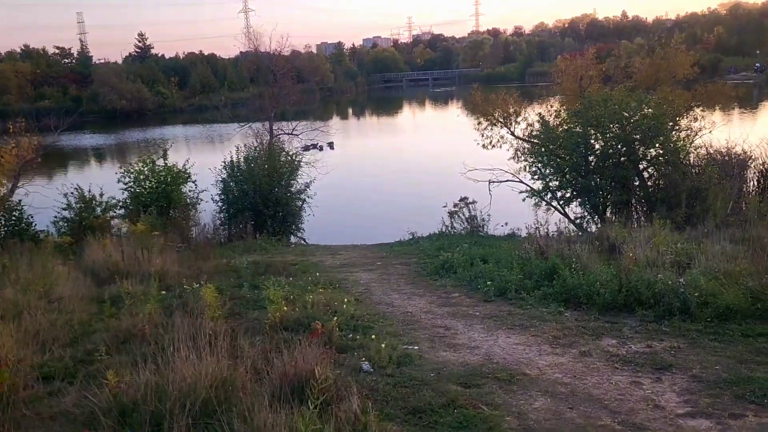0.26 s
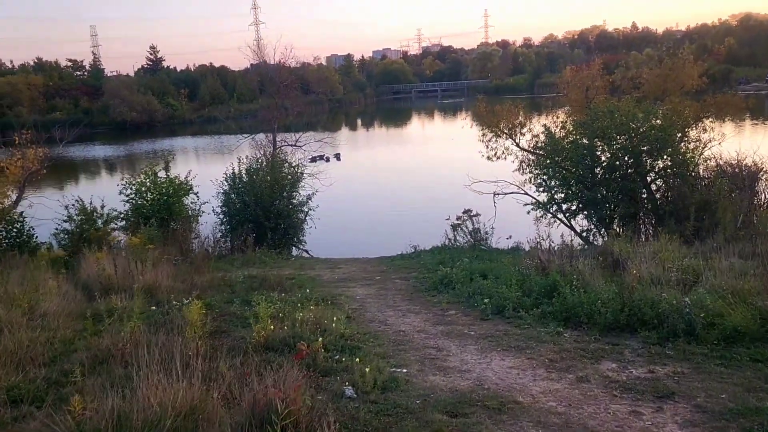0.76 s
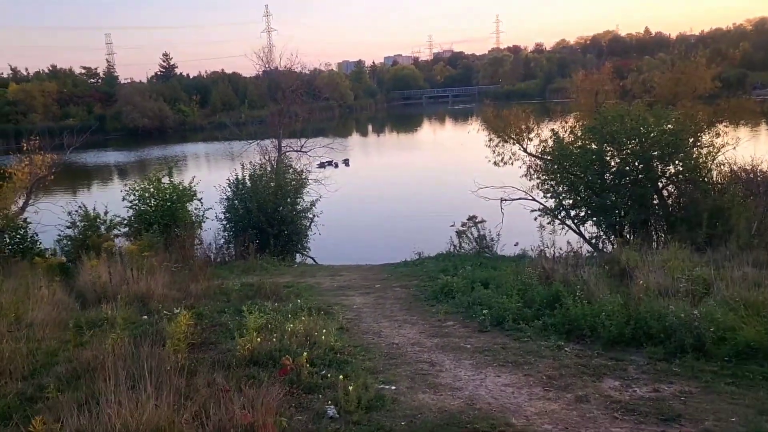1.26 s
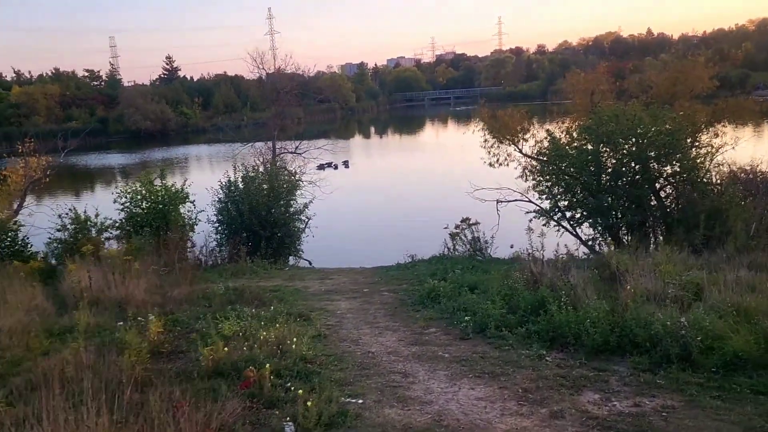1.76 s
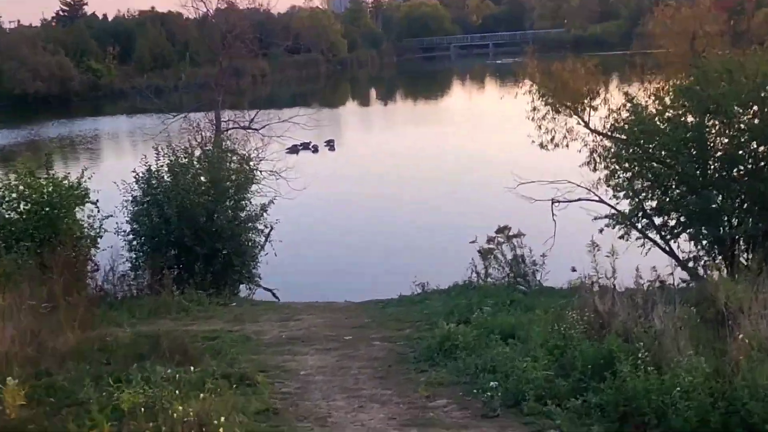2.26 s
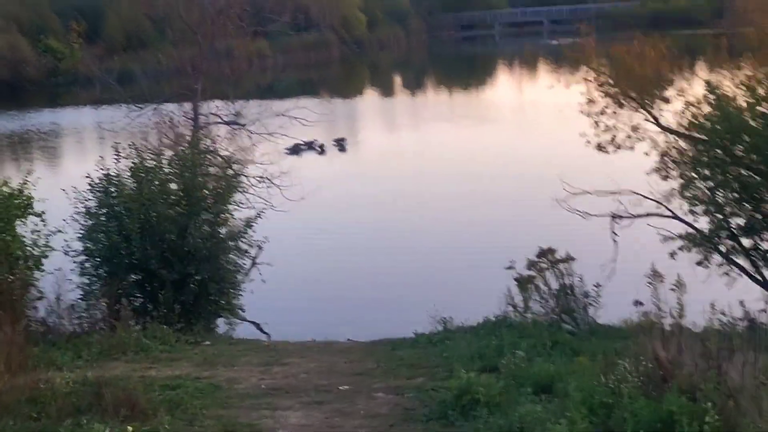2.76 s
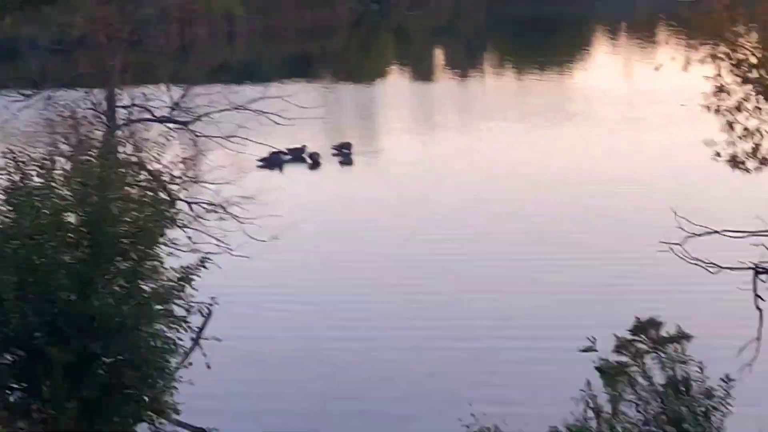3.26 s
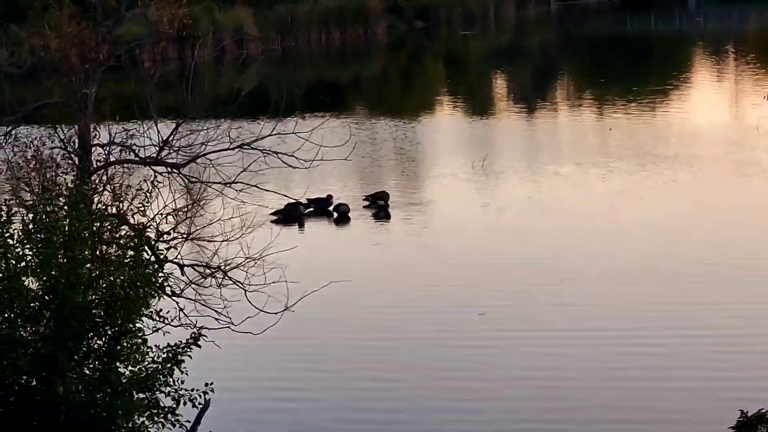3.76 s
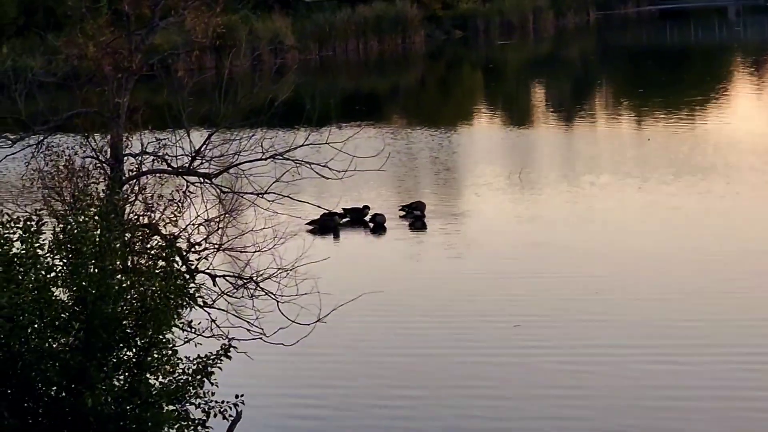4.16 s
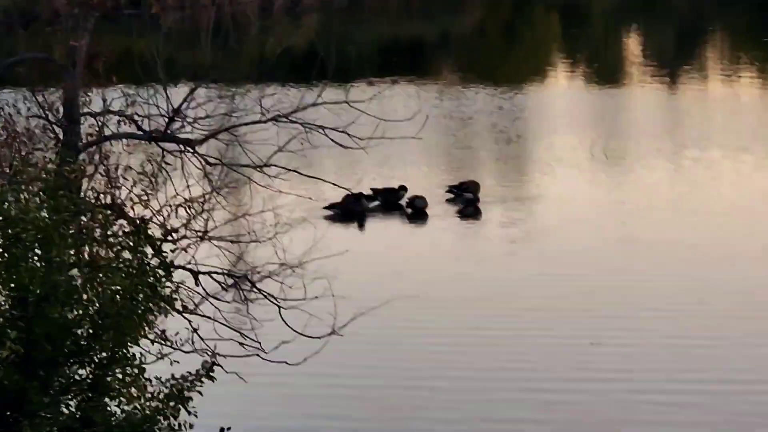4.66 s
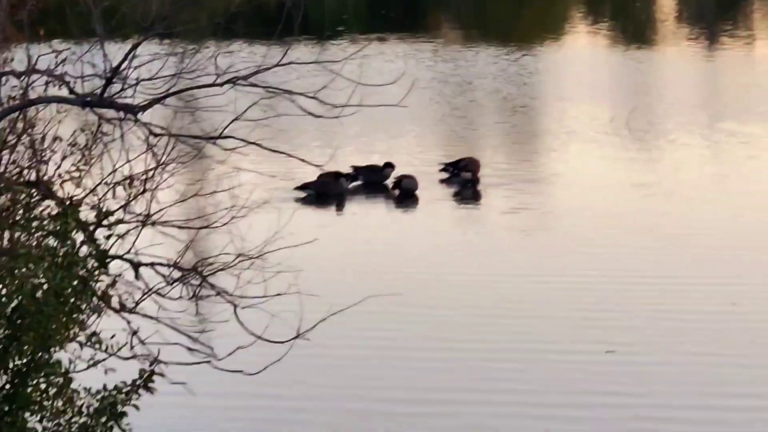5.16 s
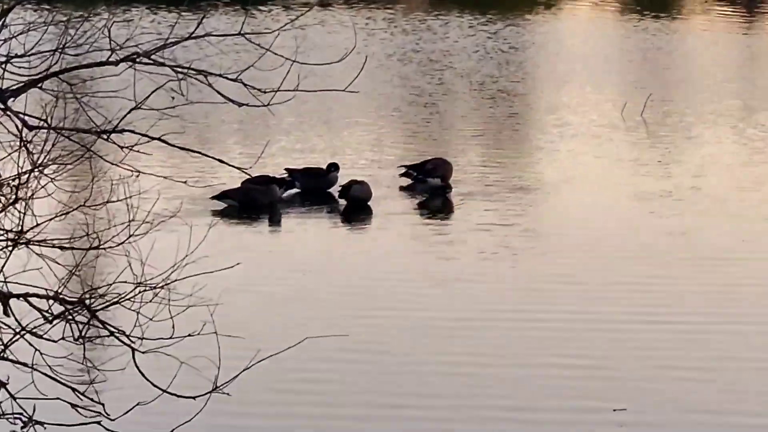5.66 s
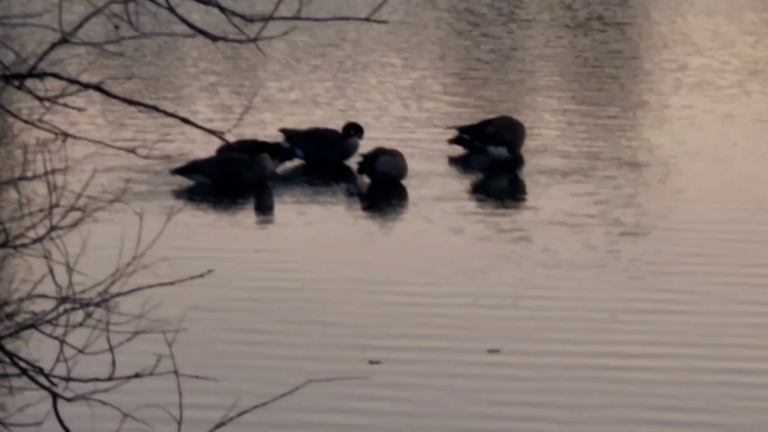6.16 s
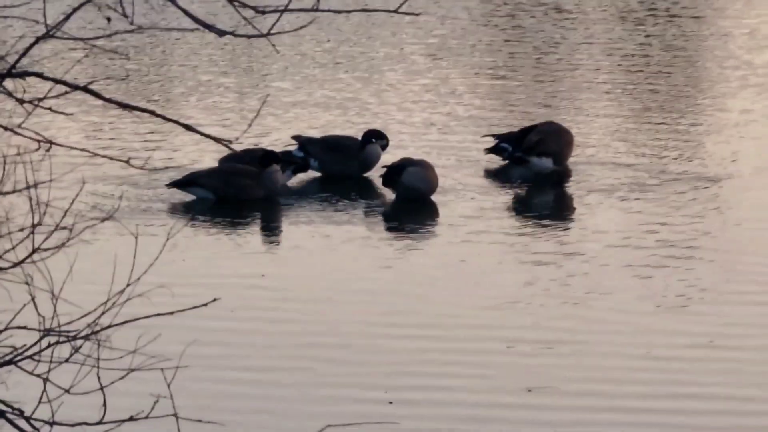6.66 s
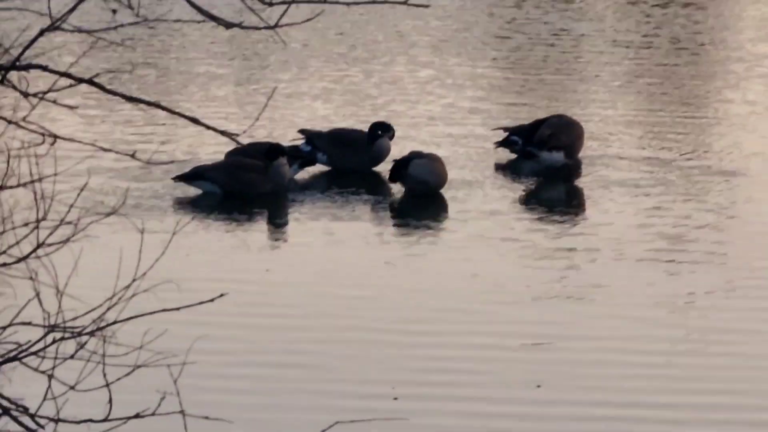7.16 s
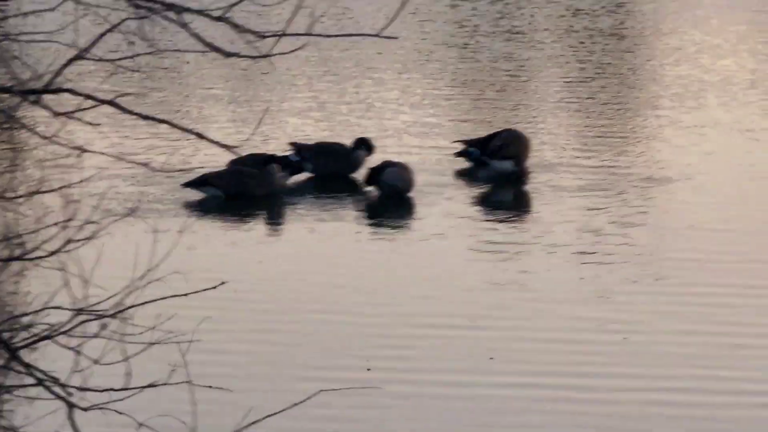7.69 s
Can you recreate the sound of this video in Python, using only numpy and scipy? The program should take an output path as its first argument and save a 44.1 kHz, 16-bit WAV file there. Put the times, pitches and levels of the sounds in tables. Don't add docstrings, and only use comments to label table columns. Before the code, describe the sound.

A still pond outdoors at dusk, captured nearly in mono by a phone with a thinned, noise-reduced background and cut treble. Very soft distant traffic, faint insect hiss and quick bush-cricket rasps run throughout, about thirteen strokes a second, with tiny far peeps and slight low wind puffs. At 0.35 seconds a goose honks loudly: a brief low hoarse note snaps at 0.4 into a higher, brassy one, sags and ends by 0.5, leaving a faint bank echo. At about 1.5 a sharp hollow knock clacks, with a quick rattle. A small peep comes near 2.1. The second honk, at 2.85 to 3.0, is similar and bright, after a faint tree-cricket trill rises. From 3 seconds a lower cricket pulses evenly. The last honk comes at 5.55 to 5.7. Afterwards only quiet murmurs, weak peeps and crickets remain until about 7.9.

```python
import sys
import numpy as np
from scipy import signal
from scipy.io import wavfile
from scipy.ndimage import uniform_filter1d

SR = 44100
rng = np.random.default_rng(int(sys.argv[2]) if len(sys.argv) > 2 else 0)


def ratio_of_db(decibels):
    return 10 ** (np.asarray(decibels, float) / 20)


def store_pcm(level_fs):
    pcm = np.round(np.clip(level_fs, -1, 1) * 32767).astype(np.int16)
    wavfile.write(sys.argv[1], SR, np.atleast_2d(pcm).T)


N = 349713

# f/Hz, level per Hz/dB
TRAFFIC_COLOUR = [(71, -44), (120, -19.5), (178, -14.5), (243, -13), (433, -2), (509, 0.5), (558, -1.5),
                  (605, -2), (1130, -1.5), (1360, -7.5), (1600, -28), (1750, -31.5), (1900, -35),
                  (2470, -47.5), (4180, -120)]
SWELL_DB = [10, 4.5, 6.5]
BREAKS = [
    0.4,
    2.896,
    5.59,
]
# t/s, peak level/dB, half length/s
GUSTS = [(.01, -65.5, 0.18), (0.412, -69, .14), (1.369, -81, .08), (1.501, -81.5, .08), (5.151, -87, .12),
         (2.315, -75, .12), (2.869, -71, .11), (3.183, -70.5, 0.1), (3.491, -71, 0.062), (4.57, -73, 0.15),
         (4.959, -74, .12), (5.582, -79.5, .1), (6.688, -73.5, 0.11), (7.002, -83.5, .3),
         (7.739, -75, 0.13)]
# f/Hz, level per Hz/dB
GUST_COLOUR = [(15, -29.5), (40, -16.5), (62, 6), (100, 0), (160, -11), (300, -32)]
# t/s, level/dB
CHORUS = [(0.0, -65.5), (1.37, -86), (5.79, -65.5), (6.43, -73.5), (7.93, -67)]
# f/Hz, level per Hz/dB
CHORUS_COLOUR = [(3800, -22.5), (4600, -17), (5100, -13.5), (6000, -1), (7000, 12), (7900, -2), (8300, -34)]
# f/Hz, level per Hz/dB
HISS_COLOUR = [(900, -18.5), (1600, -3), (2200, 0.5), (3300, 0), (4000, -1.5), (4600, 5.5), (5200, 10.5),
               (8000, 6.5)]
# t/s, level/dB
TRILL = [(0.0, -82), (1.15, -87), (1.66, -78.5), (2.92, -73), (3.4, -89), (4.1, -91.5), (4.7, -99),
         (5.26, -98), (5.61, -82), (6.4, -83.5), (7.33, -80.5), (7.57, -87.5), (7.93, -110.5)]

# f/Hz, width/Hz, level/dB
HIGH_WING = [(6610, 380, -6), (7030, 330, 0), (7544, 330, -7)]
# first stroke t/s, last stroke t/s, level/dB
PHRASES = [(.019, 2.428, 0), (2.994, 5.519, 0), (5.596, 7.852, 0), (4.772, 5.543, -1), (7.425, 7.505, -3),
           (3.745, 3.98, -3), (6.03, 6.26, -5), (6.955, 7.035, -4)]
STROKE_COUNTS = [32, 33, 30, 11, 2, 4, 4, 2]
# t/s, peak level/dB
HIGH_EFFORT = [(0, -66.5), (.42, -48.5), (.65, -79), (.95, -72.5), (1.05, -57.5), (1.2, -73.5), (1.5, -59),
               (1.7, -72.5), (2.29, -79), (2.335, -53.5), (2.5, -70.5), (3.4, -58.5), (3.6, -66),
               (3.8, -53.5), (4.7, -57.5), (5.1, -55), (5.9, -52.5), (7.9, -55.5)]
# f/Hz, width/Hz, level/dB
LOW_WING = [(5933, 190, 6), (5550, 120, -9.5), (6450, 170, -4.5)]
# t/s, peak level/dB
LOW_EFFORT = [(3, -62.5), (3.5, -60), (4.3, -60.5), (4.9, -57.5), (6.2, -59), (7, -57.5), (7.9, -59.5)]

# middle t/s, spread/s, f/Hz, level/dB
CHIPS = [(.09, 0.029, 158, -61.5), (.106, .0094, 3900, -69), (.115, 0.013, 2564, -58.5),
         (.31, .014, 1002, -43), (.891, 0.052, 1564, -70), (1.049, 0.015, 3825, -59.5),
         (1.466, 0.006, 1310, -62), (1.6, .018, 5120, -75), (1.515, 0.014, 5200, -61.5),
         (2.161, 0.02, 1440, -59), (2.309, 0.015, 5120, -74.5), (2.367, .0098, 5170, -61),
         (2.374, .01, 3840, -64), (2.76, 0.035, 520, -55), (2.833, .009, 995, -42.5),
         (3.974, 0.0087, 2870, -67), (5.554, 0.0049, 638, -37), (6.34, 0.018, 4730, -82),
         (5.09, .004, 900, -64.5), (7.892, 0.036, 680, -59.5), (2.362, 0.011, 7090, -70),
         (2.37, 0.012, 3200, -64)]
# middle t/s, spread/s, f/Hz, level/dB
TWEETS = [(.125, .015, 1620, -68.5), (7.9, 0.015, 1366, -60), (.15, .013, 2480, -61.5),
          (.99, .017, 4930, -69), (1.069, 0.012, 2510, -60.5), (1.126, 0.016, 2470, -78),
          (2.125, 0.013, 1562, -52), (2.119, .003, 1594, -48), (2.663, 0.019, 4060, -76),
          (4.411, .015, 5140, -69), (4.91, .021, 2070, -70), (4.915, .016, 1790, -68),
          (5.446, .027, 4020, -77.5), (6.731, 0.011, 5000, -67), (1.799, 0.01, 2600, -73),
          (4.386, .012, 2105, -76), (4.475, 0.013, 5000, -74), (6.972, .0086, 3700, -74)]
# middle t/s, spread/s, f/Hz, level/dB
WHISTLES = [(.295, 0.018, 499, -49.5), (.507, .012, 4190, -63), (2.987, .009, 1379, -37.5),
            (3.045, .016, 1365, -49), (.5, 0.01, 2115, -50.5), (5.705, .016, 2070, -56),
            (2.99, .012, 2110, -55.5), (.49, 0.0042, 1304, -52), (.732, 0.0055, 6010, -70),
            (1.07, 0.054, 5050, -75.5), (1.723, 0.012, 4980, -74), (2.442, 0.016, 4300, -74),
            (2.607, 0.013, 4210, -71), (3.092, 0.015, 1374, -43.5), (3.112, 0.017, 1940, -65),
            (3.796, 0.0064, 4280, -72), (6.053, 0.021, 1950, -74.5)]
# middle t/s, spread/s, f/Hz, level/dB, bend/share of pitch per spread
BENDS = [(.322, .012, 4960, -65, .009), (.298, .015, 960, -46, .012), (2.8, .014, 940, -53, .02),
         (2.83, .008, 985, -46, .02), (5.525, .012, 4000, -70, .01), (6.16, .03, 1915, -63, -.009),
         (7.238, .026, 1870, -69, -.006), (6.638, .018, 3630, -61, .008), (6.672, .008, 4000, -66, .004),
         (6.645, .011, 2520, -69, .025), (6.845, .018, 4850, -71, -.003), (6.84, .018, 5200, -75, -.012),
         (6.885, .014, 2260, -75, -.02), (6.93, .016, 2130, -71, .015), (6.85, .014, 3560, -68, -.012),
         (6.29, .01, 4330, -76, -.01), (5.05, .012, 4780, -72, .01), (5.085, .009, 5150, -75, .012),
         (.865, .022, 2100, -73, -.004)]

# t/s, f/Hz, membrane level/dB, windpipe ring level/dB, brightness/dB
LOW_1 = [(.34, 492, -72, -47.5, -85), (.356, 489, -49.5, -33, -66.5), (0.365, 479, -42, -19.5, -52.5),
         (0.379, 490, -37, -14, -48.5), (0.394, 514, -27, -12, -37), (.402, 523, -26.5, -17.5, -45),
         (0.411, 541, -25, -20.5, -48), (.422, 524, -31, -36, -55), (.432, 529.7, -62, -53, -70.5)]
LOW_2 = [(2.838, 505.7, -59.5, -51.5, -73.5), (2.851, 496.8, -32, -25.5, -49.5),
         (2.862, 486.6, -38, -17.5, -41.5), (2.872, 516.7, -26, -18, -37.5),
         (2.881, 521.5, -25, -17, -30.5), (2.888, 537.7, -22.5, -27, -45), (2.898, 543, -19, -36, -42.5),
         (2.907, 528.4, -32, -39, -52), (2.918, 531.4, -54.5, -61, -67)]
LOW_3 = [(5.543, 516, -59.5, -52.5, -75), (5.557, 481.4, -39, -41, -55.5),
         (5.567, 487.5, -35, -24.5, -43.5), (5.578, 498.4, -32.5, -26.5, -41.5),
         (5.59, 509, -23.5, -22.5, -34.5), (5.598, 539, -22.5, -34.5, -46), (5.606, 523, -23.5, -34.5, -49),
         (5.614, 536, -31.5, -41, -48.5), (5.632, 527.7, -49, -59.5, -69.5)]
# t/s, f/Hz, membrane level/dB, windpipe ring level/dB, brightness/dB
HIGH_1 = [(.408, 697, -51.5, -52, -60), (.416, 707.5, -22, -28, -54), (.423, 698.5, -24.5, -17, -36),
          (.436, 696, -22, -18, -39), (.45, 701, -28, -17.5, -46.5), (.462, 681, -30, -23.5, -45),
          (.474, 661, -36.5, -23, -54.5), (.484, 638, -47.5, -37.5, -57), (.498, 630, -64.5, -47.5, -65.5)]
HIGH_2 = [(2.896, 719, -52, -48.5, -57), (2.902, 702.3, -25, -24.5, -39.5),
          (2.911, 700.5, -21.5, -14, -32.5), (2.927, 688.7, -24.5, -14, -37),
          (2.941, 681, -25.5, -19.5, -43), (2.95, 652, -24.5, -20.5, -34.5), (2.96, 640, -29.5, -27, -45.5),
          (2.971, 608, -37, -37.5, -57), (2.983, 599.5, -52, -54.5, -71.5)]
HIGH_3 = [(5.6, 727, -41.5, -49, -53.5), (5.61, 698, -21.5, -26.5, -38), (5.616, 696, -24.5, -13, -34.5),
          (5.631, 692.6, -23.5, -19, -36.5), (5.659, 685.5, -28.5, -16.5, -40),
          (5.666, 653.5, -32.5, -20.5, -46.5), (5.675, 640, -32, -33, -59),
          (5.683, 617, -37.5, -27.5, -62.5), (5.697, 612, -62, -54.5, -62)]
# low note level/dB, high note level/dB, sum tones level/dB
THIRDS = [(-9, -20, -5.5), (1.7, -21, -5.5), (-1.5, -25.5, 1)]
LOW_SHARE = [(.8, .25), (0.22, .7), (0.78, .25)]
HIGH_SHARE = (.27, .3)
# multiple, level/dB
SUM_TONES = [(1, 0.5), (2, -20.5), (3, -23), (4, -19), (5, -14.5), (6, -26.5)]
# level near 2 kHz/dB, level near 2.8 kHz/dB, level above 4.5 kHz/dB
NECK_DB = [(-1.5, -9, 9.5), (0, 0, -1.5), (-15, 1, -2.5)]
# f/Hz, level/dB
LOW_THROAT = [(1900, -22.5), (2150, -12.5), (2600, -9), (3100, -9.5), (3700, -2), (4200, -2.5),
              (4700, -26.5), (5300, -20.5), (6300, -36), (8000, -36)]
# f/Hz, level/dB
HIGH_THROAT = [(1900, -11.5), (2780, -5), (3480, -0.5), (4180, 2), (4880, -10.5), (5580, -14), (6300, -25),
               (7000, -26), (8000, -35)]
# f/Hz, level per Hz/dB
BREATH_COLOUR = [(150, -44.5), (300, -27), (600, -5.5), (1000, -9), (1400, -3.5), (1700, -24),
                 (2000, -32.5), (2600, -43)]

# delay t/s, level/dB
BANKS = [(.024, -41), (.068, -54), (.115, -51), (.155, -42), (.235, -56), (0.451, -55.5)]
# f/Hz, t60/s
POND_DECAY = [(300, 0.17), (1400, 0.82), (2200, 0.71), (4000, 0.11), (8000, 0.07)]

# t/s, level/dB
KNOCK_RUSH = [(1.455, -61), (1.481, -47), (1.487, -34), (1.498, -39), (1.512, -35.5), (1.53, -41.5),
              (1.555, -47.5), (1.605, -55.5), (1.68, -85)]
# t/s, peak level/dB
KNOCK_TICKS = [
    (1.474, -36),
    (1.4855, -27),
    (1.4888, -11.5),
    (1.4935, -25),
    (1.5085, -28),
    (1.5115, -21),
    (1.5175, -26),
]
# f/Hz, level per Hz/dB
KNOCK_COLOUR = [(88, -69), (150, -37), (368, -28.5), (522, -1), (587, 11), (1520, 5), (1940, -6.5),
                (2260, 1), (2900, -10), (3330, 0), (3950, -20), (4390, -46), (4900, -22), (5500, -26),
                (7240, -59), (8000, -49.5), (10400, -71), (17600, -120)]
# f/Hz, level/dB, t60/s
KNOCK_MODES = [(520, -17.5, 0.17), (900, -14.5, 0.034), (1180, -3, 0.0092), (1500, -13, 0.037),
               (2590, -18.5, 0.015), (3130, -32, 0.021)]

# f/Hz, side over mid level/dB
SIDE_DB = [(60, -27.5), (170, -31.5), (300, -22), (420, -26), (700, -30.5), (2000, -33.5), (6000, -23),
           (8300, -32)]
# f/Hz, level per Hz/dB
FIZZ_COLOUR = [(7600, -28.5), (8200, 1), (9000, -7.5), (11500, -5.5), (14500, -13.5)]


def evened(x):
    return x / np.sqrt(np.mean(x ** 2) + 1e-20)


def read(points, hz):
    f, value = np.transpose(points)
    return np.interp(np.log(hz + 1), np.log(f + 1), value)


def level(rows):
    s, db = np.transpose(rows)
    return ratio_of_db(np.interp(np.arange(N) / SR, s, db, -200, -200))


def add(mix, s, sound):
    part = mix[max(round(s * SR), 0):][:len(sound)]
    part += sound[:len(part)]


def resonate(x, hz, width):
    turn = np.exp(2j * np.pi * np.cumsum(hz * np.ones(len(x))) / SR)
    r = np.exp(-np.pi * width / SR)
    smooth = signal.lfilter([(1 - r) ** 2], [1, -2 * r, r * r], x * turn.conj())
    return 2 * (turn * smooth).real


def smoothed(x, size):
    return uniform_filter1d(uniform_filter1d(x, size=size), size=size)


def noise(colour, patchy_db, size=512, count=N):
    hz = np.fft.rfftfreq(size, 1 / SR)
    a, b, patches = rng.standard_normal((4 * count // size + 5, len(hz), 3)).T
    patches = uniform_filter1d(patches, size=5, axis=0)
    patches = evened(uniform_filter1d(patches, size=9, axis=1))
    z = (a + 1j * b) * ratio_of_db(read(colour, hz)[:, None] + patchy_db * patches)
    return evened(signal.istft(z, nperseg=size, noverlap=size - size // 4)[1][:count])


def traffic():
    t = np.arange(N) / SR
    lag_s, rise_s, fall_s = 0.11, 0.41, 0.27
    swell_db = sum(np.interp(t - s - lag_s, [-rise_s, 0, fall_s], [0, db, 0])
                   for s, db in zip(BREAKS, SWELL_DB))
    hum = evened(resonate(rng.standard_normal(N), 520, 25)) * ratio_of_db(-7.0)
    return (noise(TRAFFIC_COLOUR, 1.6, size=1024) + hum) * ratio_of_db(-61.5 + swell_db + 1.35)


def gusts(calm_db=-92):
    t = np.arange(N) / SR
    puffs_db = [np.interp(abs(t - s), [0, half], [db, calm_db]) for s, db, half in GUSTS]
    return noise(GUST_COLOUR, 1.5, size=2048) * ratio_of_db(np.max(puffs_db, axis=0))


def insects_and_hiss():
    chorus = noise(CHORUS_COLOUR, 4.6, size=256) * level(CHORUS) * ratio_of_db(-1.5)
    return chorus + ratio_of_db(-77 + 5) * noise(HISS_COLOUR, 6)


def tree_cricket(hz=3290, depth=.33, wing_hz=52.9, waver_hz=22):
    throb = 1 + depth * np.cos(2 * np.pi * wing_hz * np.arange(N) / SR + 1.1)
    waver = waver_hz * evened(uniform_filter1d(rng.standard_normal(N), size=4000))
    whistle = resonate(rng.standard_normal(N), hz + waver, 95)
    return evened(whistle * throb) * level(TRILL) * ratio_of_db(7.5)


def phrased_strokes(uneven_db=2.5, wobble_s=.002):
    phrases = [[np.linspace(first, last, n), np.full(n, db)]
               for (first, last, db), n in zip(PHRASES, STROKE_COUNTS)]
    s, lift_db = np.hstack(phrases)
    luck = rng.standard_normal((len(s), 2))
    effort_db = np.interp(s, *np.transpose(HIGH_EFFORT)) + lift_db
    return np.transpose([s + wobble_s * luck[:, 0], effort_db + uneven_db * luck[:, 1]])


def bush_cricket(strokes, wing, slide, length, teeth_hz, gain_db):
    out = np.zeros(N)
    u = np.arange(0, 1, 1 / (length * SR))
    swell = np.sin(np.pi * u ** .85) ** .6
    for s, db in strokes:
        teeth = rng.standard_normal(2500)[:len(u)] * (0.56 + np.cos(np.pi * teeth_hz * length * u) ** 2)
        luck = rng.standard_normal((len(wing), 2))
        rasp = 0
        for (hz, width, lift_db), (a, b) in zip(wing, luck):
            sliding_hz = hz * (1 + 0.025 * a + slide * (.5 - u))
            rasp = rasp + ratio_of_db(lift_db + 1.2 * b) * resonate(teeth, sliding_hz, width)
        add(out, s - 0.2 * length, ratio_of_db(db + gain_db) * evened(rasp) * swell)
    return out


def peeps(rows, fuzz):
    out = np.zeros(N)
    for s, spread, hz, db, *bend in rows:
        u = np.arange(-3, 3, 1 / (spread * SR))
        air, flutter = rng.standard_normal((2, 15000))
        flutter = ratio_of_db(1.3 * evened(smoothed(flutter, 200)))
        pitch = hz * (1 + (bend or [-0.0048])[0] * u)
        spread_hz = 2.8 * fuzz * np.sqrt(hz)
        whistle = resonate((air * flutter)[:len(u)], pitch, spread_hz)
        whistle = evened(resonate(whistle, pitch, spread_hz))
        bell = np.exp(-u ** 2 / 4) * signal.windows.tukey(len(u), .5)
        add(out, s - 3 * spread, ratio_of_db(db) * whistle * bell)
    return out


def sung(rows, share, lift_db, slack_db=0):
    s, hz, one_db, two_db, bright_db = np.transpose(rows)
    bright_db = bright_db - slack_db * np.maximum(1 - hz / hz[2], 0)
    three_db = share[0] * np.maximum(one_db, two_db) + share[1] * bright_db + lift_db
    return np.transpose([s, hz, one_db, two_db, three_db, bright_db])


def note(rows, throat, rasp_db, jitter, rough):
    s, *columns = np.transpose(rows)
    t = np.arange(s[0], s[-1], 1 / SR)
    hz, *db = (np.interp(t, s, c) for c in columns)
    one, two, three, upper = np.sqrt(2) * ratio_of_db(np.array(db))
    drift = jitter * uniform_filter1d(rng.standard_normal(len(t)), size=80)
    phase = 2 * np.pi * np.cumsum(hz * (1 + drift)) / SR

    shake = rng.standard_normal((16, len(t), 2)) @ [1, 1j]
    shake = uniform_filter1d(shake, size=190, axis=1)
    shake = evened(shake.view(float)).view(complex)
    stack = 0
    for k in range(4, 16):
        partial = (1 + rough * shake[k]) * np.exp(1j * k * (phase + k))
        stack = stack + ratio_of_db(read(throat, k * hz)) * partial.real

    crack = 1 + 1.3 * np.exp(-((t - s[0]) / .022) ** 2)
    puffs = (1 + np.cos(phase)) * crack
    breath_colour = [(1200, -69.0)] + [(f, 1.5 * g) for f, g in throat]
    breath = rough * .42 * puffs * noise(breath_colour, 3.5, count=len(t))
    voice = one * np.cos(phase) + two * np.sin(2 * phase) - three * np.cos(3 * phase)
    voice += upper * (evened(stack) + breath)
    voice += noise(BREATH_COLOUR, 2.2, count=len(t)) * puffs * ratio_of_db(rasp_db) * (one + two)
    carrier = np.sqrt(one) * np.exp(1j * phase)
    return np.array([voice, carrier]) * signal.windows.tukey(len(t), .2)


def goose(order=4):
    out = np.zeros(N)
    honks = zip((LOW_1, LOW_2, LOW_3), (HIGH_1, HIGH_2, HIGH_3), LOW_SHARE, THIRDS, NECK_DB)
    for low, high, low_share, (low_db, high_db, sum_db), (mid_db, dip_db, top_db) in honks:
        aim = [(2200, mid_db), (2600, dip_db), (3000, dip_db), (3400, 0), (4300, 0), (4700, top_db)]
        low_throat = [(f, g + read(aim, f)) for f, g in LOW_THROAT]
        high_throat = [(f, g + read(aim, f)) for f, g in HIGH_THROAT]
        low_rows = sung(low, low_share, low_db)
        high_rows = sung(high, HIGH_SHARE, high_db, slack_db=130)
        a = note(low_rows, low_throat, rasp_db=-28, jitter=.055, rough=.42)
        b = note(high_rows, high_throat, rasp_db=-27, jitter=0.04, rough=0.36)
        low_start, high_start = low[0][0], high[0][0]
        add(out, low_start, a[0].real)
        add(out, high_start, b[0].real)

        overlap = a[1, round((high_start - low_start) * SR):]
        both = b[1, :len(overlap)]
        mixed = sum(ratio_of_db(db) * np.exp(1j * (round(k) - 1) * np.angle(both)) for k, db in SUM_TONES)
        add(out, high_start, ratio_of_db(sum_db + 5.0) * (overlap * both * mixed).real)
    return signal.sosfiltfilt(signal.butter(order, 230, "highpass", fs=SR, output="sos"), out)


def pond(x, tail_db, order=3):
    taps = np.zeros(SR)
    at = np.arange(400, SR - 20, 20)
    taps[at + rng.integers(0, 20, len(at))] = rng.choice([-1., 1.], len(at))
    hz, t, z = signal.stft(taps, SR, nperseg=256)
    decay = ratio_of_db(-60 * t / read(POND_DECAY, hz)[:, None])
    tail = signal.istft(z * decay, SR, nperseg=256)[1][:SR]
    tail *= ratio_of_db(tail_db) / np.linalg.norm(tail)
    for s, db in BANKS:
        clump = rng.standard_normal(1500) * np.hanning(1500)
        add(tail, s, ratio_of_db(db) * clump / np.linalg.norm(clump))

    dull = signal.sosfilt(signal.butter(order, [1200, 2500], "bandpass", fs=SR, output="sos"), x)
    dull = dull + ratio_of_db(-2) * resonate(dull, 2300, 290)
    body = signal.sosfilt(signal.butter(order, [430, 1150], "bandpass", fs=SR, output="sos"), x)
    dull = dull + ratio_of_db(-4) * body
    shimmer = ratio_of_db(4.0 * evened(smoothed(rng.standard_normal(N), 230)))

    reeds = rng.standard_normal(4000) * ratio_of_db(-60 * np.arange(4000) / SR / 0.18)
    reeds /= np.linalg.norm(reeds)
    bright = signal.sosfilt(signal.butter(order, 1950, "highpass", fs=SR, output="sos"), x)
    far = shimmer * signal.oaconvolve(dull, tail)[:N]
    return far + ratio_of_db(-10.5) * signal.oaconvolve(bright, reeds)[:N]


def knock(order=4):
    t = np.arange(6000) / SR
    count = 2 * SR
    rush = level(KNOCK_RUSH)[:count]
    dull = noise(KNOCK_COLOUR[:7] + [(2600, -59)], 4.2, size=256, count=count)
    sharp = noise(KNOCK_COLOUR, 2.8, size=256, count=count) * (rush / rush.max()) ** 0.8
    out = np.pad(rush * (.5 * dull + 1.16 * sharp), (0, N - count))
    ring = sum(ratio_of_db(db - 60 * t / t60) * np.sin(2 * np.pi * hz * t) for hz, db, t60 in KNOCK_MODES)
    for s, db in KNOCK_TICKS:
        add(out, s, ratio_of_db(db) * ring * np.minimum(t / 0.0011, 1))
    return signal.sosfilt(signal.butter(order, 380, "highpass", fs=SR, output="sos"), out)


def steady_strokes(start_s=3.029, period_s=.08546):
    s = np.arange(start_s, N / SR - .01, period_s)
    effort_db = np.interp(s, *np.transpose(LOW_EFFORT))
    return np.transpose([s, effort_db + 1.4 * rng.standard_normal(len(s))])


def scene():
    mid = traffic() + gusts() + insects_and_hiss() + tree_cricket()
    mid += bush_cricket(phrased_strokes(), HIGH_WING, slide=.05, length=.038, teeth_hz=258, gain_db=-6)
    mid += peeps(CHIPS, fuzz=5.1) + peeps(TWEETS, fuzz=2.6)
    mid += peeps(WHISTLES, fuzz=0.66) + peeps(BENDS, fuzz=1.6)
    bird = goose()
    mid += bird + pond(bird, tail_db=-38) + knock()
    mid += bush_cricket(steady_strokes(), LOW_WING, slide=0.055, length=0.036, teeth_hz=119.7, gain_db=-3.5)
    return np.array([mid, mid])


def roll_off(x):
    return signal.sosfilt(signal.butter(12, 14700, fs=SR, output="sos"), x)


def record(dry):
    hz, t, z = signal.stft(dry[0], SR, nperseg=512)
    floor = np.median(abs(z[:, ::4]), axis=1)[:, None]
    over_db = 20 * np.log10(uniform_filter1d(abs(z), size=3) / floor + 1e-9)
    gate_db = np.clip(0.22 * (over_db - 5), -8, 0)
    treble_db = read([(7800, -1.5), (8150, -15.5), (8500, -67)], hz)[:, None]
    z *= ratio_of_db(gate_db + treble_db)
    side = z * np.exp(2j * np.pi * rng.random(z.shape)) * ratio_of_db(read(SIDE_DB, hz) + 2.5)[:, None]
    ports = signal.istft(np.array([z + side, z - side]), SR, nperseg=512)[1][:, :N]

    fizz = noise(FIZZ_COLOUR, 1.5, size=256, count=2 * N).reshape(2, N)
    fizz = ratio_of_db(-91 + 2) * ratio_of_db([[1.8], [0]]) * fizz
    duck = 1 / (1 + uniform_filter1d(abs(dry[0]), size=2500) / ratio_of_db(-41.5))
    return roll_off(ports + fizz * duck)


dry = scene()
out = record(dry)
store_pcm(out)
```